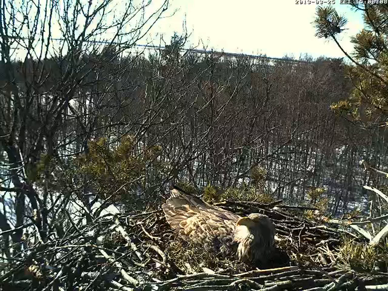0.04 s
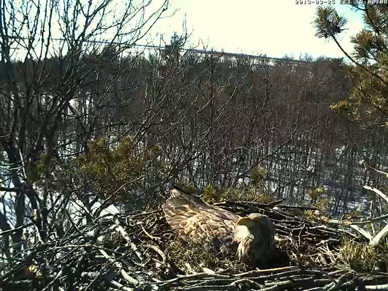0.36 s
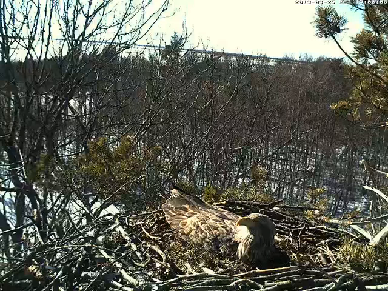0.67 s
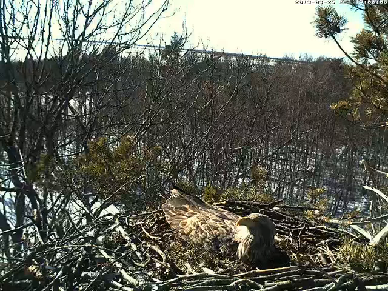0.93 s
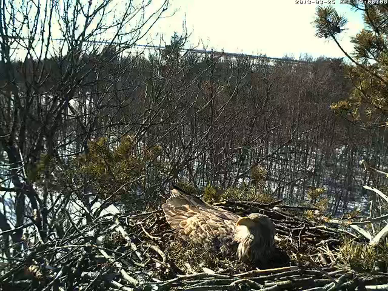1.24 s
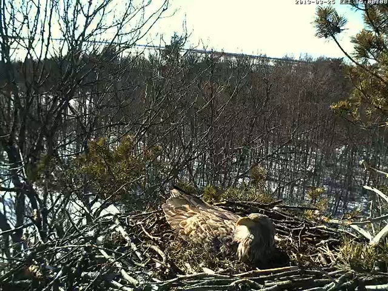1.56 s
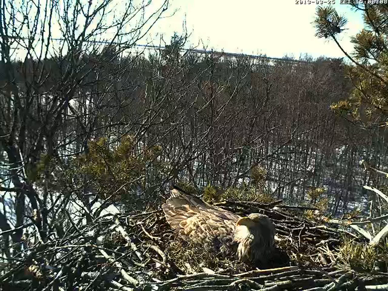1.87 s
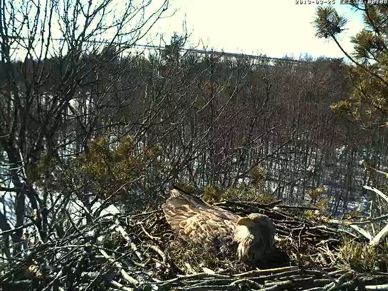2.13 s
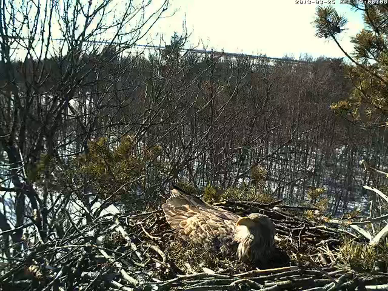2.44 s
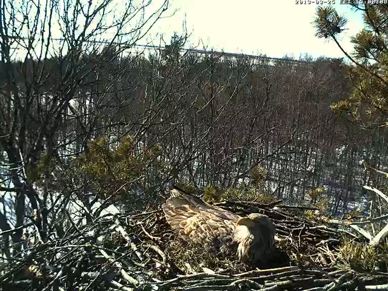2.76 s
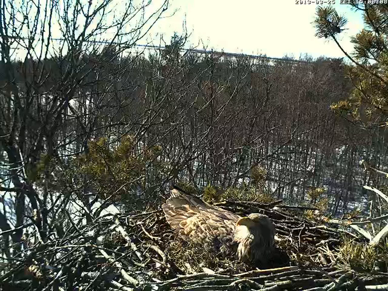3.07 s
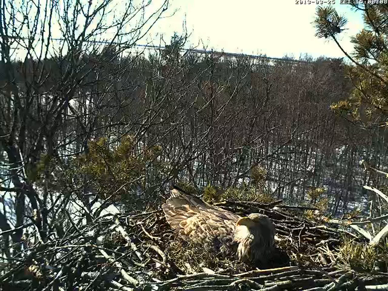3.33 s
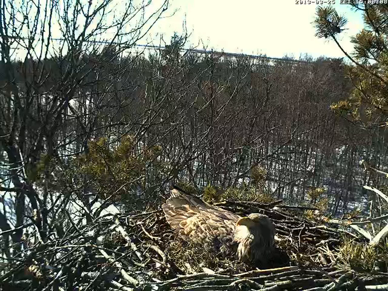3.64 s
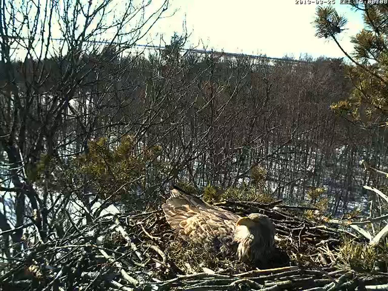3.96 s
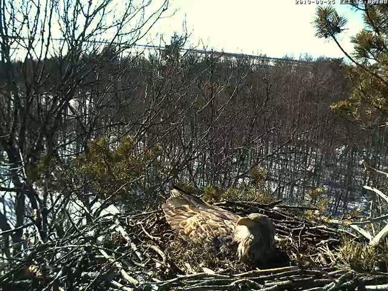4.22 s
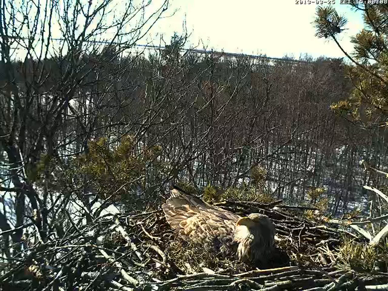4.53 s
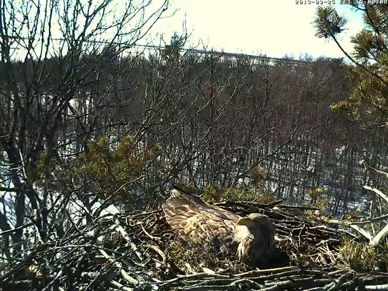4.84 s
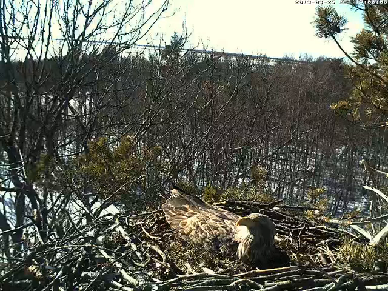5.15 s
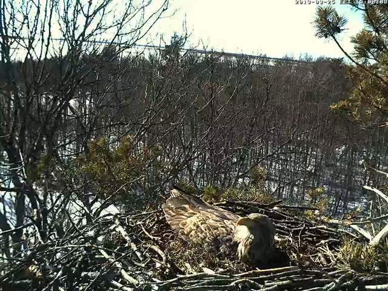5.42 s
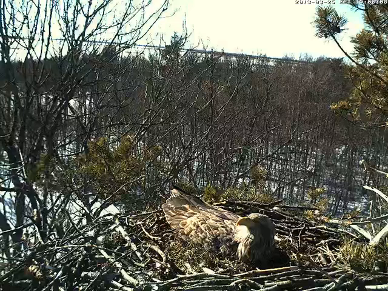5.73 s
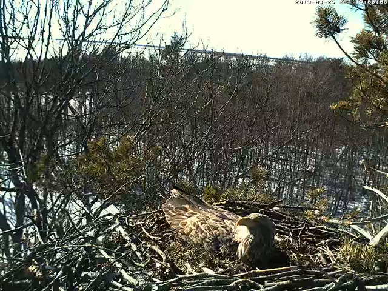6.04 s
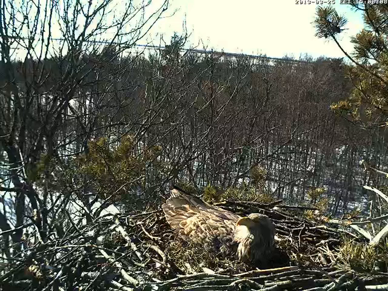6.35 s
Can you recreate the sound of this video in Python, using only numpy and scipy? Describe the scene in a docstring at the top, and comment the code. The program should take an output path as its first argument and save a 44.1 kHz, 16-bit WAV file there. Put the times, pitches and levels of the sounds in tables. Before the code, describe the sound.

Loud, raspy yelps from a large bird on its nest, each cracking into squeaks and throaty creaks, then only light wind.

```python
"""A quick series of harsh eagle yelps, very close, breaking into squeaks and ending in short creaks.
The bird is on its nest above a winter wood: its voice arches in pitch, then slackens into separate
pulses that ring the throat. From farther off the trees send back a faint echo and a light wind murmurs;
a twig of the nest stirs twice. The microphone sits by the nest and feeds a telephone-band recorder,
which the yelps drive far into overload."""
import sys
import numpy as np
from scipy import signal
from scipy.fft import rfft, irfft, next_fast_len
from scipy.io import wavfile

SR = 44100
rng = np.random.default_rng(int(sys.argv[2]) if len(sys.argv) > 2 else 0)


def waveform_to_disk(signal):
    """Save audio, clipped to [-1, 1], as 16-bit WAV at the path in sys.argv[1]."""
    frames = np.transpose(np.atleast_2d(signal))
    scaled = np.clip(frames, -1, 1) * 32767
    samples = np.round(scaled).astype(np.int16)
    wavfile.write(sys.argv[1], SR, samples)


N = 290619

# spectrum of the rasp in the eagle's voice: (frequency [Hz], level [dB])
RASP_SPECTRUM = [(100, -38), (600, -17), (1300, 1.5), (1800, -3.5), (2600, -7), (3500, -0.5), (4000, -17.5)]


def yelps_and_squeaks(jitter=.013, harsh_jitter=.003, waver=.00481, shimmer_db=1.52, rasp_db=-23,
                      slack_rasp_db=-17, attack_s=.00057, release_s=.0022, throat_hz=3000, width_hz=330):
    """One rough voice, close to the microphone; its weight sways between fundamental and octave."""
    out = np.zeros(N)
    unsteady, flutter, sway = wobble(350), wobble(300), wobble(79)
    rasp = coloured_noise(RASP_SPECTRUM)
    for times, pitch, low_db, octave_db, harsh_db in [*yelp_contours(), *squeak_contours()]:
        at = np.arange(int((times[0] - .01) * SR), int((times[-1] + .02) * SR))
        t = at / SR
        detune = (jitter + harsh_jitter * harsh_db) * unsteady[at] + waver * sway[at]
        hz = np.interp(t, times, pitch) * (1 + detune)
        phase = 2 * np.pi * np.cumsum(hz) / SR
        low = from_db(np.interp(t, times, low_db) + 3.5 * sway[at])
        octave = from_db(np.interp(t, times, octave_db) - .52 * sway[at])
        # the third harmonic flares as it sweeps through an upper throat resonance
        flare = .87 / (1 + ((3 * hz - throat_hz) / width_hz) ** 2)
        tone = low * np.cos(phase) + octave * (np.cos(2 * phase + np.pi / 5) + flare * np.cos(3 * phase))
        # the voice is cleaner at full effort and raspier when slack
        effort = np.hypot(low, octave)
        slack = np.exp(-effort ** 2)
        tone *= from_db((shimmer_db - .5 * slack) * flutter[at] + .15 * slack)
        hiss = effort * (from_db(rasp_db + harsh_db) + slack * from_db(slack_rasp_db)) * rasp[at]
        attack = np.exp(np.minimum(t - times[0], 0) / attack_s)
        release = np.exp(-np.maximum(t - times[-1], 0) / release_s)
        # a new note takes over from the one sounding, its rasp just ahead of its tone
        out[at] *= 1 - attack * release
        out[at] += release * (tone * attack + hiss * np.sqrt(attack))
    return out


def yelp_contours(rise_power=1.6, fall_power=3, closing_loss_db=3.5,
                  catch_s=.0044, catch_width_s=.0019, catch_hz=837.3,
                  quaver_depth=.059, quaver_period_s=.0064, quaver_decay_s=.0077):
    """A yelp opens low, catches, quavers, climbs to its top and drops as the push gives out."""
    # yelps: (time [s], length [s], opening pitch [Hz], top pitch [Hz], closing pitch [Hz],
    # place of the top [share of length], fundamental [dB], octave [dB], extra at the opening [dB])
    yelps = [(0.2359, .066, 839, 1258, 1112, 0.71, -1.5, 2, -4),
             (0.4817, 0.042, 1021, 1236, 1110, .64, -8, 0, 2),
             (0.7083, 0.036, 1060, 1212, 1128, .70, -3, -1, 5),
             (0.9346, 0.026, 1046, 1215, 1130, 0.57, 2, 1.5, 0.5),
             (1.543, 0.05, 1042, 1207, 1130, 0.73, 4, 0.5, 1),
             (1.8122, 0.06, 1022, 1252, 1070, .82, 2.5, 1.5, -3.5),
             (2.1046, 0.068, 854.5, 1222, 1036, .78, 5.5, 2.5, -7),
             (2.3721, .0495, 952, 1232, 1073, 0.73, 1, 2, -6),
             (2.604, .0316, 1013, 1241, 1118, .68, 0.5, 2.5, -2.5),
             (2.828, 0.02, 1212, 1291, 1067, 0.71, 3, -4.5, 2.5),
             (3.458, 0.046, 1045, 1237, 1116, 0.66, -0.5, -3, 4),
             (3.688, 0.051, 1067, 1220, 1117, .76, -3, -0.5, 0.5)]
    # the voice gains strength as it rises: (pitch [Hz], fundamental [dB], octave [dB])
    strength = [(850, -31, -5.5), (1000, -15.5, -7), (1100, -15, -1), (1211, -5.5, 3), (1238.3, -1, 3),
                (1291, 6, -0.5)]
    strength_hz, low_gain_db, octave_gain_db = np.transpose(strength)
    u = np.linspace(0, 1, 200)
    for start, length, opening_hz, top_hz, closing_hz, top_at, low_db, octave_db, opening_db in yelps:
        rising = np.maximum(1 - u / top_at, 0)
        falling = (np.maximum(u - top_at, 0) / (1 - top_at)) ** fall_power
        pitch = top_hz - (top_hz - opening_hz) * rising ** rise_power - (top_hz - closing_hz) * falling
        since_catch = u * length - catch_s
        pitch += (catch_hz - pitch) * np.exp(-(since_catch / catch_width_s) ** 2)
        quaver = quaver_depth * (since_catch > 0) * np.exp(-since_catch / quaver_decay_s)
        pitch *= 1 - quaver * np.cos(2 * np.pi * since_catch / quaver_period_s)
        push_db = opening_db * np.sqrt(rising) - closing_loss_db * falling
        low_db += push_db + np.interp(pitch, strength_hz, low_gain_db)
        octave_db += push_db + np.interp(pitch, strength_hz, octave_gain_db)
        yield start + u * length, pitch, low_db, octave_db, 0


def squeak_contours(edge_loss_db=3.5, fade_db=3.5):
    """The voice breaks into a small gliding arch, strongest just before its middle."""
    # squeaks, within a yelp or alone: (time [s], length [s], pitch [Hz], glide [share of pitch],
    # arch [share of pitch], fundamental [dB], octave [dB], extra rasp [dB])
    squeaks = [(0.311, .009, 1419, -0.034, 0.016, -5, -12.5, 4.5),
               (0.5247, 0.0092, 1395, -0.011, .01, 3, -9.5, 2),
               (0.727, 0.0099, 1373, 0.051, 0.016, 9, 0, 0),
               (0.9512, 0.0039, 1256, -.04, .01, 6.5, 1.5, -1),
               (0.9715, .0175, 1600, -0.11, 0.089, 7, -9.5, 7),
               (1.1801, .003, 1360, 0.02, 0.012, -1, -10.5, 10),
               (1.1899, 0.0039, 1496, -0.28, 0.057, -0.5, -4, 5.5),
               (1.2867, 0.013, 1899, -0.069, .16, 7.5, -14.5, 7),
               (1.559, 0.024, 1376, 0.026, .035, 6, -3.5, -2.5),
               (1.591, .0055, 1371, -0.025, 0.014, -4, -12.5, 5),
               (2.1851, .009, 948, -0.11, .01, -22, -6, -1), (2.6203, .012, 1386, -0.043, .035, 9, 1, -0.5),
               (2.837, .004, 1375, -0.036, 0.016, 7.5, 0, -4),
               (2.8615, .003, 1464, 0.21, 0.0074, -10.5, -15, 5),
               (2.944, .015, 1811, -0.0015, .13, 7, -9.5, 7),
               (3.1908, 0.0051, 1330, -0.26, 0.011, -3.5, -6.5, 5),
               (3.2035, .007, 1339, -0.056, .01, 1.5, -12.5, 3.5),
               (3.2382, 0.0058, 1480, -0.13, 0.013, 0, -16, 5.5),
               (3.4749, .021, 1363, 0.025, 0.024, 10, -2.5, -2.5),
               (3.5035, .007, 1344, 0.05, 0.0097, 0, -16, 1),
               (3.7231, 0.0037, 1265, -.02, 0.011, 7.5, 8.5, -1.5)]
    u = np.linspace(-.5, .5, 50)
    edge = (2 * u) ** 2
    shape_db = -edge_loss_db * edge - fade_db * u
    for start, length, hz, glide, arch, low_db, octave_db, harsh_db in squeaks:
        pitch = hz * (1 + glide * u - arch * edge)
        yield start + (u + .5) * length, pitch, low_db + shape_db, octave_db + shape_db, harsh_db


def creaks(period_s=.0065, slip_s=.00046, uneven_db=.65, mix_db=2.5, main_db=-4, main_t60=.0062,
           rise_s=.00015, sag=.06, rasp_db=-18, rasp_t60=.023, stray=.045):
    """Uneven pulses of the slack voice ring the throat, which sinks in pitch; each puffs out rasp."""
    # runs of pulses: (time [s], length [s], level [dB], fade over the run [dB], main resonance [Hz])
    runs = [(.304, 0.0043, -11.5, 0, 1410), (0.323, 0.018, -6.5, 22, 1380), (0.537, .0285, -3, 5, 1600),
            (0.75, 0.0093, -10, -1.5, 1880), (0.765, 0.022, -2.5, 3, 1600), (.9959, 0.0022, -8, 0, 1440),
            (1.007, .024, -8, -4, 1600), (1.197, 0.011, -6.5, -1.5, 1550), (1.224, 0.0034, -12, 0, 1550),
            (1.27, .009, -24, -8.5, 2100), (1.309, 0.0085, -6.5, -3, 1518), (1.328, .026, -5, 0, 1485),
            (1.602, 0.0091, -3.5, 1.5, 1640), (1.621, 0.0032, -11.5, 0, 1700),
            (1.87, 0.017, -12.5, -4, 1619), (1.898, 0.0022, -11.5, 0, 1680), (2.181, 0.0056, -12, 0, 1900),
            (2.204, 0.005, -15, 2, 1335), (2.434, 0.026, -9.5, 5, 1490), (2.645, 0.009, -11.5, 0.5, 1370),
            (2.6582, 0.023, -5, 2.5, 1400), (2.854, 0.022, -16.5, -3, 1500), (2.933, .001, -23.5, 0, 2400),
            (2.959, 0.022, -8.5, -1.5, 1530), (2.9854, .019, -3.5, 0, 1599), (3.212, 0.0035, -5, -2, 1660),
            (3.258, 0.037, -4, 3.5, 1470), (3.5152, 0.014, -5, 2.5, 1408), (3.744, 0.011, -13, -3, 1480),
            (3.768, 0.0012, -7.5, 0, 1630)]
    # throat resonances: (frequency [Hz], level [dB], t60 [s])
    throat = [(1060, -23, .008), (1320, -7.5, 0.025), (1712, -6.5, 0.032), (2280, -12, 0.024),
              (2866, -18.5, 0.026), (3000, -21.5, .009)]
    hz, mode_db, t60 = np.transpose(throat)[:, :, None]
    out = np.zeros(N)
    t = np.arange(int(.04 * SR)) / SR
    rise = 1 - np.exp(-t / rise_s)
    rasp = coloured_noise(RASP_SPECTRUM)
    for run_start, length, db, fade_db, main_hz in runs:
        count = 1 + round(length / period_s)
        for k, start in enumerate(np.linspace(run_start, run_start + length, count)):
            slip, strength = rng.standard_normal(2)
            start += slip_s * slip * (0 < k < count - 1)
            at = int(start * SR) + np.arange(len(t))
            tension = 1 + sag * (1 - (2 * k + 1) / count)
            pulse = from_db(main_db - 60 * t / main_t60) * np.sin(2 * np.pi * main_hz * tension * t)
            mix = from_db(mode_db + mix_db * rng.standard_normal(hz.shape))
            mode_hz = hz * (tension + stray * rng.standard_normal(hz.shape))
            phase = 2 * np.pi * (mode_hz * t + rng.random(hz.shape))
            pulse += np.sum(mix * from_db(-60 * t / t60) * np.sin(phase), axis=0)
            pulse += from_db(rasp_db - 60 * t / rasp_t60) * rasp[at]
            out[at] += from_db(db - fade_db * k / count + uneven_db * strength) * rise * pulse
    return out


def twigs():
    """Twigs stir in the nest and ring with a soft, dull knock."""
    # knocks: (time [s], level [dB])
    knocks = [(3.134, -29), (6.227, -27)]
    # twig modes: (frequency [Hz], level [dB], t60 [s])
    modes = [(259.7, -3, 0.071), (480, -6.5, 0.028), (900, -19, .018), (1700, -23, .01)]
    clicks = np.zeros(N)
    for start, db in knocks:
        clicks[int(start * SR)] = from_db(db)
    return sum(from_db(db) * ring(clicks, hz, t60) for hz, db, t60 in modes)


def wood_echo(voice, near_db=-36, near_t60=.09, trees_db=-42, trees_delay_s=.065, trees_t60=.35,
              far_db=-50, far_t60=2.3):
    """Scatter reaches the microphone from nest and branches, then the nearest trees and the far wood."""
    # colour of the echo: (frequency [Hz], level [dB])
    spectrum = [(300, -15), (900, 0.5), (1300, 1), (1800, -1), (2400, 2.5), (3000, -2), (4000, -3.5)]
    t = np.arange(int(1.5 * SR)) / SR
    arrived = np.clip((t - trees_delay_s) / .02 + .5, 0, 1)
    zones = [(near_db, near_t60, 1), (trees_db, trees_t60, arrived), (far_db, far_t60, arrived)]
    power = 0
    for db, t60, onset in zones:
        decay = (onset * from_db(-60 * t / t60)) ** 2
        power += from_db(db) ** 2 * decay / decay.sum()
    # countless small reflections merge into decaying noise
    scatter = rfft(np.sqrt(power) * rng.standard_normal(len(t)))
    hz, db = np.transpose(spectrum)
    colour = from_db(np.interp(np.fft.rfftfreq(len(t), 1 / SR), hz, db))
    return signal.fftconvolve(voice, irfft(scatter * colour)[:SR])[:N]


def lingering_echo(start_s=.054, level_db=-52, hz=2400, ring_s=.021, t60=1.1):
    """A fading band of noise: the wood still rings faintly from an earlier yelp."""
    t = np.arange(N) / SR - start_s
    band = rms_one(ring(rng.standard_normal(N), hz, ring_s))
    return (t > 0) * from_db(level_db - 60 * t / t60) * band


def wind(flicker_db=1):
    """A low background murmur: the sound opens in silence, the murmur is present from about 0.07 s, dips during
    the yelps, then recovers."""
    # level of the background murmur: (time [s], level [dB])
    levels = [(0, -82), (.045, -93), (0.068, -43.5), (.5, -42), (1.45, -50.5), (2.3, -50), (2.75, -43.5),
              (4.6, -42.5), (6.59, -40.5)]
    # colour of the murmur: (frequency [Hz], level [dB])
    spectrum = [(15, -41.5), (25, -28.5), (50, -20.5), (90, -5.5), (170, -0.5), (300, -5.5), (500, -12),
                (1000, -20.5), (2200, -30), (2800, -37), (3500, -39.5), (4000, -47)]
    times, db = np.transpose(levels)
    level_db = np.interp(np.arange(N) / SR, times, db) + flicker_db * wobble(12)
    return from_db(level_db) * coloured_noise(spectrum)


def from_db(db):
    """Decibels to gain."""
    return 10 ** (np.asarray(db) / 20)


def rms_one(x):
    """Scale to rms 1."""
    return x / np.sqrt(np.mean(x ** 2) + 1e-20)


def wobble(rate_hz):
    """Random motion up to the given rate, rms 1."""
    lowpass = signal.butter(2, rate_hz, fs=SR, output="sos")
    return rms_one(signal.sosfilt(lowpass, rng.standard_normal(N + SR))[SR:])


def coloured_noise(spectrum):
    """Noise of rms 1 with the given spectrum."""
    hz, db = np.transpose(spectrum)
    size = next_fast_len(N)
    bins = np.maximum(np.fft.rfftfreq(size, 1 / SR), 1)
    gain = from_db(np.interp(np.log(bins), np.log(hz), db))
    return rms_one(irfft(rfft(rng.standard_normal(size)) * gain)[:N])


def ring(drive, hz, t60):
    """A resonance: a unit click sets off a decaying sine of height 1."""
    r, w = from_db(-60 / (t60 * SR)), 2 * np.pi * hz / SR
    return signal.lfilter([0, np.sin(w)], [1, -2 * r * np.cos(w), r * r], drive + 1e-18)


def scene():
    """One microphone at the nest: eagle and twigs close by, echo and wind beyond."""
    eagle = yelps_and_squeaks() + creaks()
    return (eagle + wood_echo(eagle) + lingering_echo() + twigs() + wind())[None]


def record(dry, rate_hz=8000, input_top=.69, output_top=.68, hardness=16, band_edge_hz=4150,
           shelf_hz=10200, treble_db=-4, cutoff_hz=16000):
    """The recorder clips at a low sample rate, folding overtones down; its smoothed output clips too."""
    low, full = rate_hz // 100, SR // 100
    narrow = np.clip(signal.resample_poly(dry, low, full, axis=-1), -input_top, input_top)
    smoothing = signal.firwin(19 * full + 1 + full % 2, band_edge_hz, fs=SR * low, window=("kaiser", 7))
    wide = signal.resample_poly(narrow, full, low, axis=-1, window=smoothing)[:, :N]
    # clipping with a rounded knee
    clipped = wide / (1 + np.abs(wide / output_top) ** hardness) ** (1 / hardness)
    # a shelf lowers the highest treble
    body = signal.fftconvolve(clipped, signal.firwin(81, shelf_hz, fs=SR)[None], "same")
    dulled = body + from_db(treble_db) * (clipped - body)
    return signal.sosfilt(signal.ellip(10, .1, 80, cutoff_hz, fs=SR, output="sos"), dulled)


dry = scene()
out = record(dry)
waveform_to_disk(out)
```